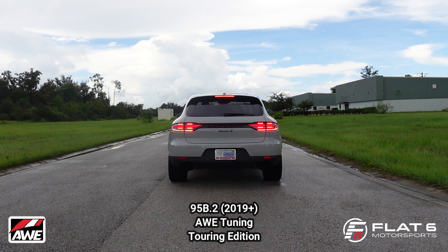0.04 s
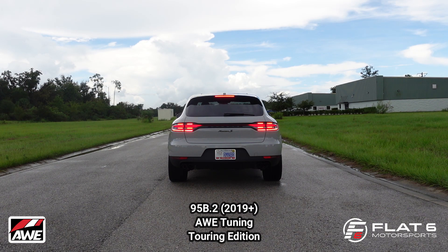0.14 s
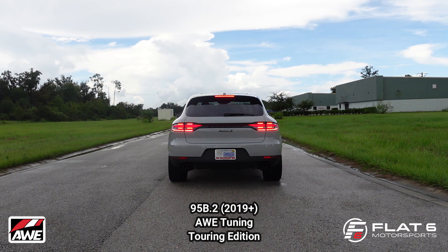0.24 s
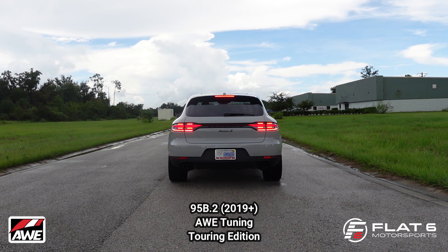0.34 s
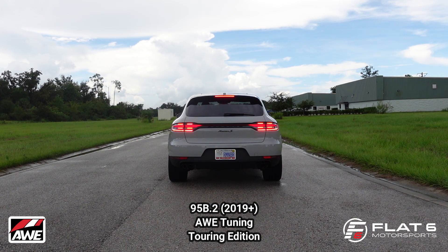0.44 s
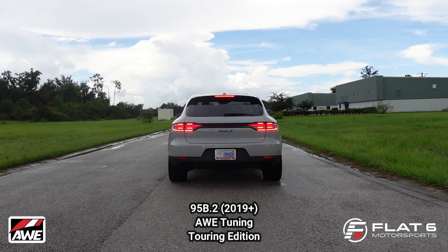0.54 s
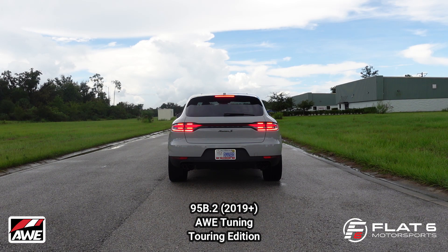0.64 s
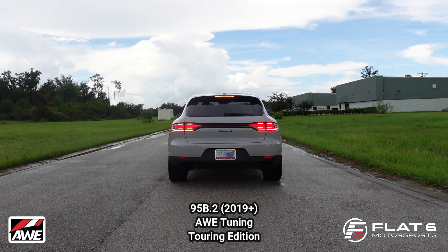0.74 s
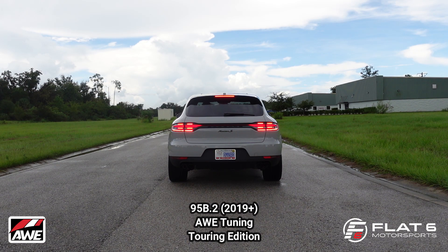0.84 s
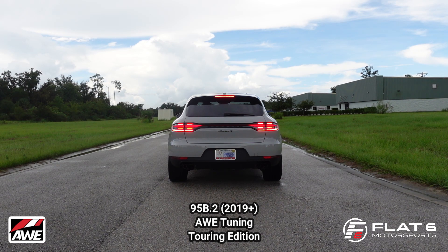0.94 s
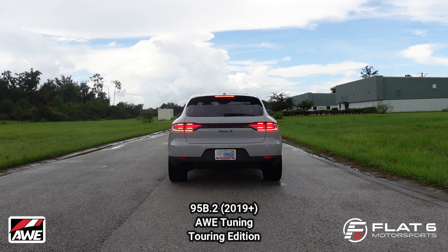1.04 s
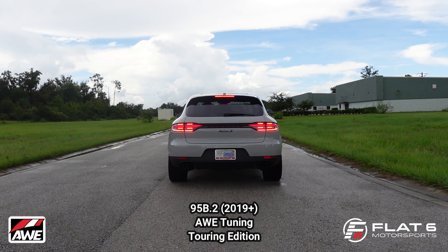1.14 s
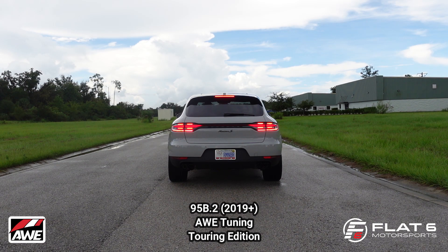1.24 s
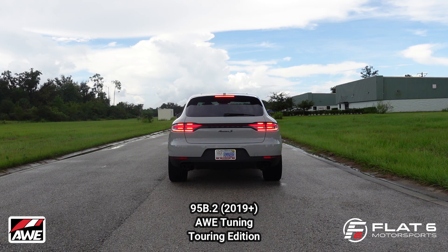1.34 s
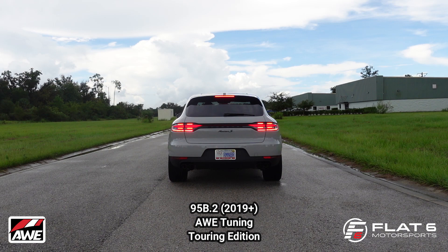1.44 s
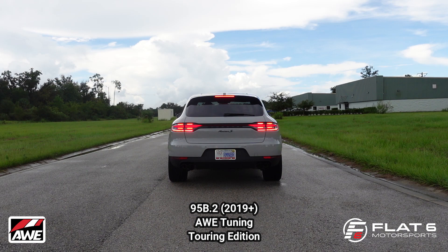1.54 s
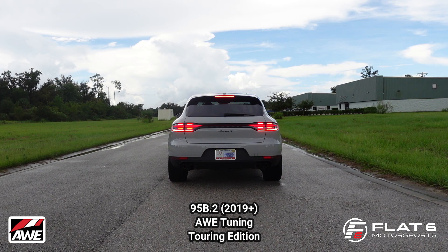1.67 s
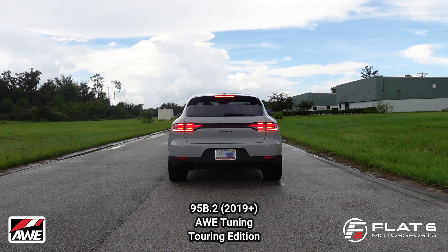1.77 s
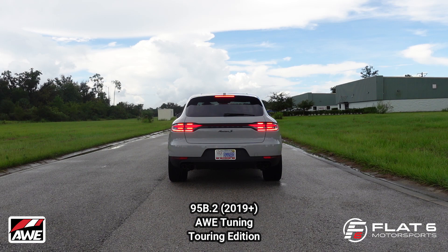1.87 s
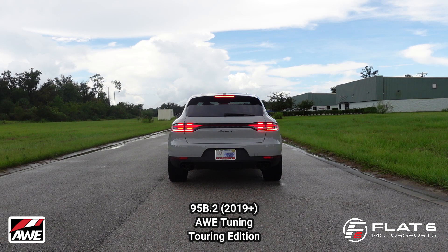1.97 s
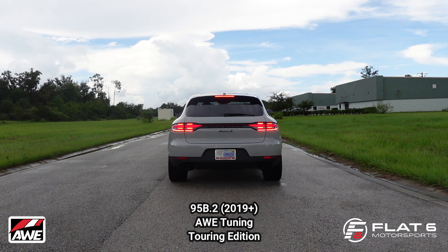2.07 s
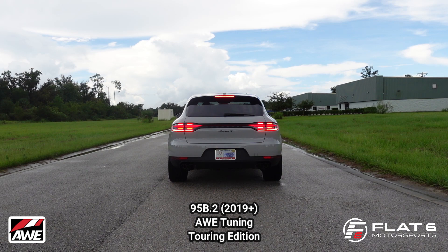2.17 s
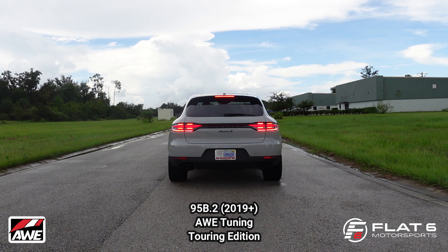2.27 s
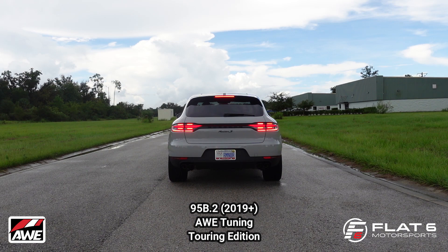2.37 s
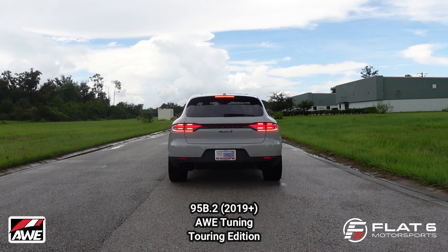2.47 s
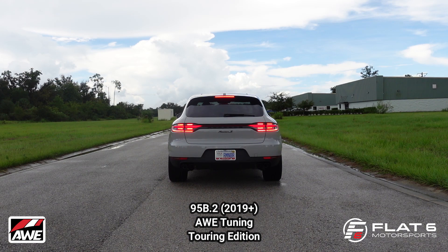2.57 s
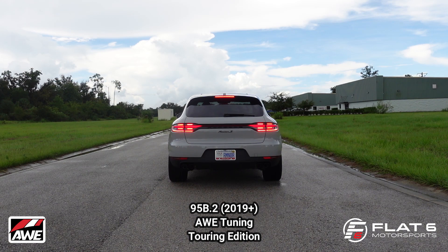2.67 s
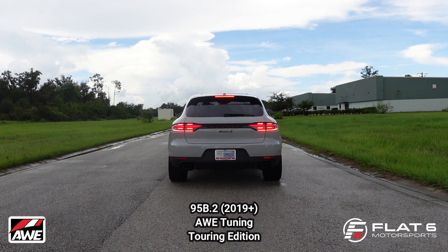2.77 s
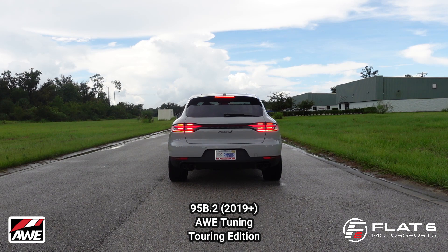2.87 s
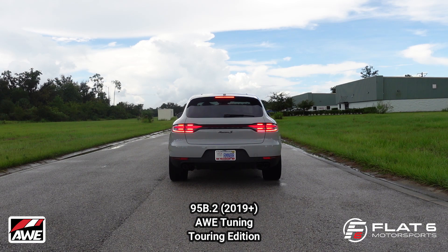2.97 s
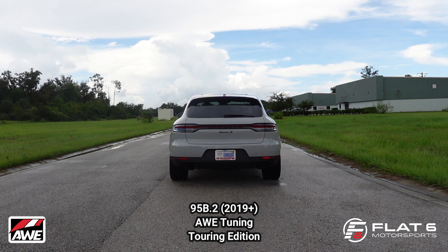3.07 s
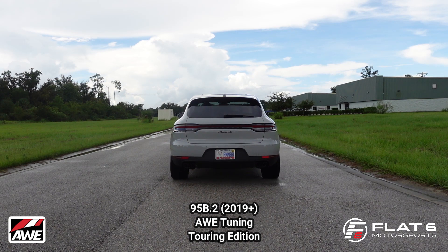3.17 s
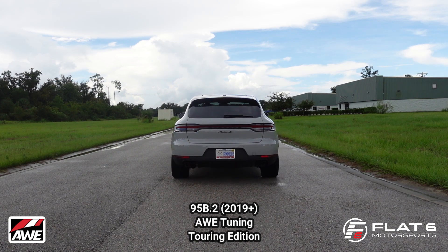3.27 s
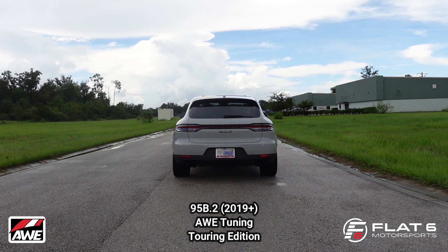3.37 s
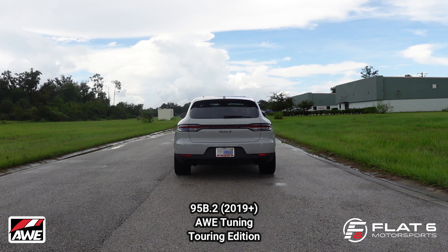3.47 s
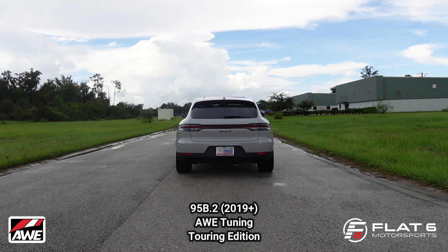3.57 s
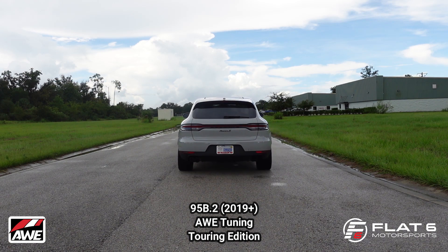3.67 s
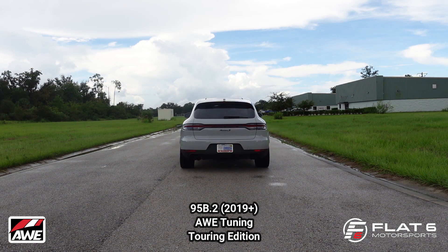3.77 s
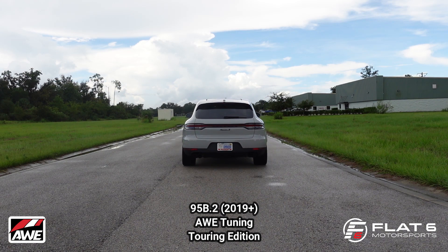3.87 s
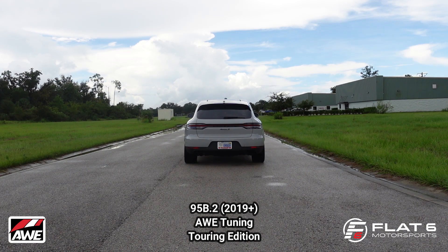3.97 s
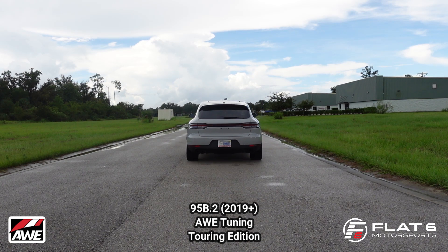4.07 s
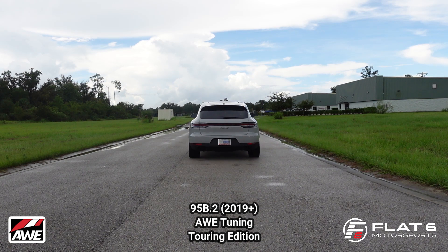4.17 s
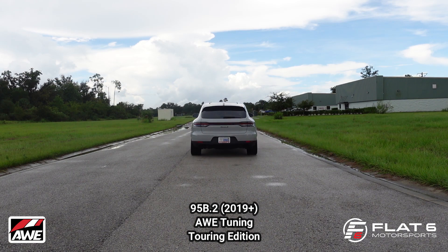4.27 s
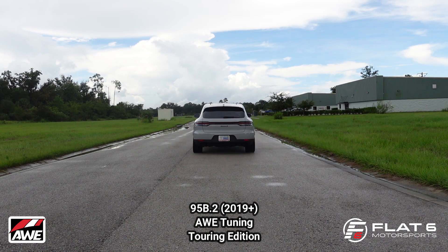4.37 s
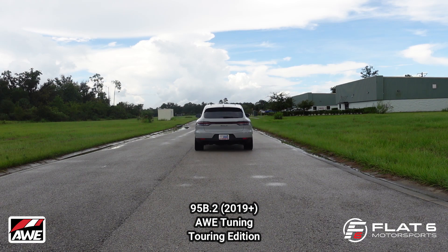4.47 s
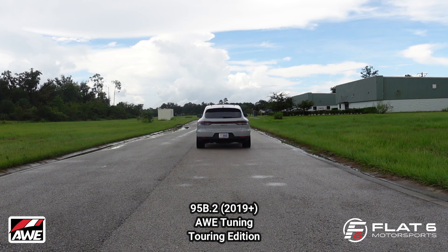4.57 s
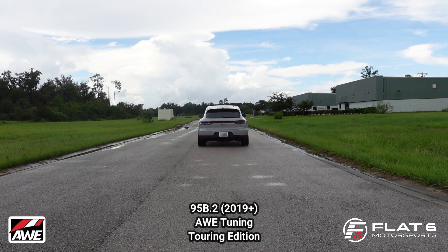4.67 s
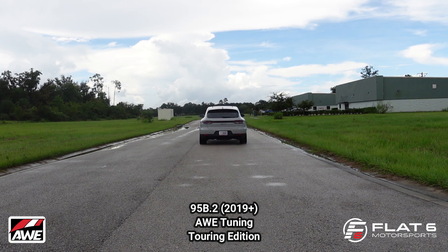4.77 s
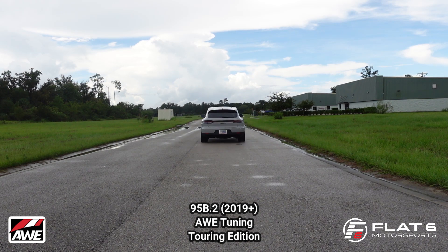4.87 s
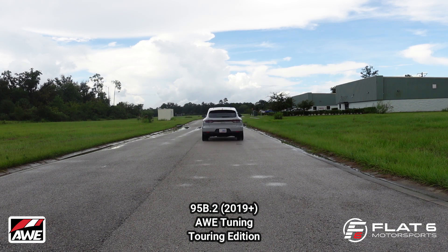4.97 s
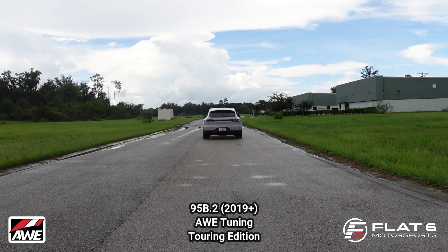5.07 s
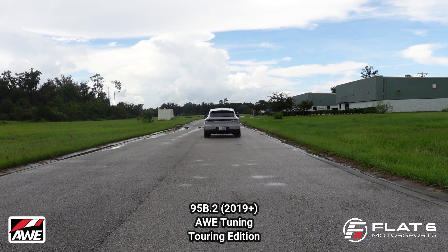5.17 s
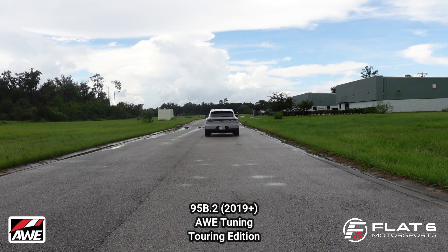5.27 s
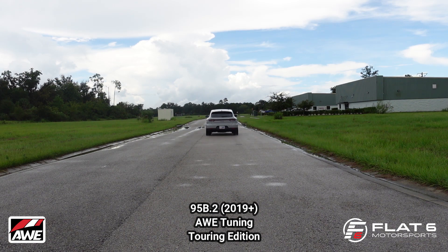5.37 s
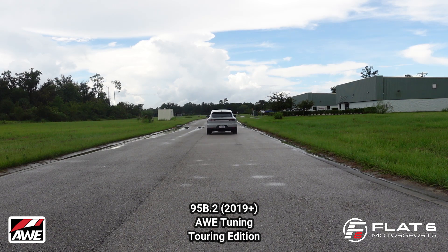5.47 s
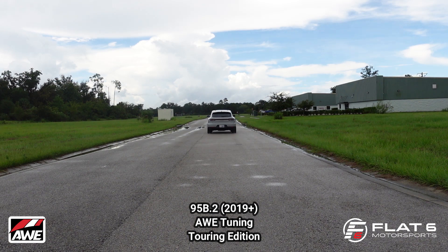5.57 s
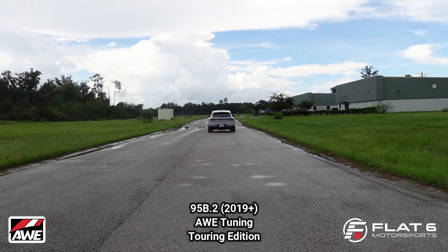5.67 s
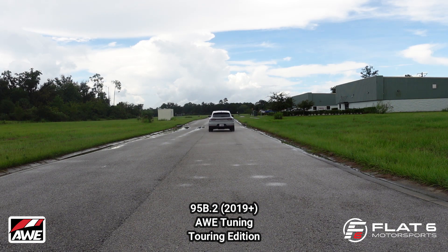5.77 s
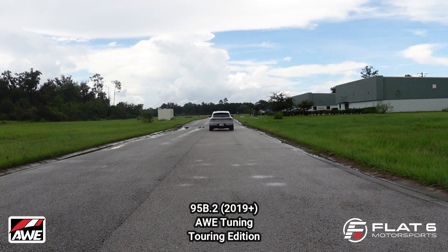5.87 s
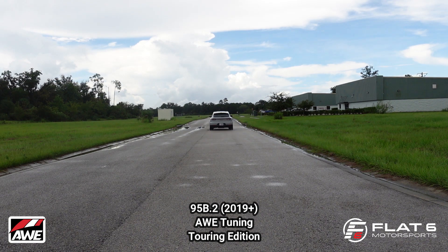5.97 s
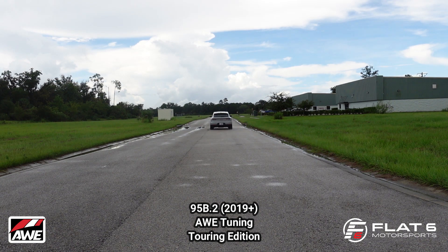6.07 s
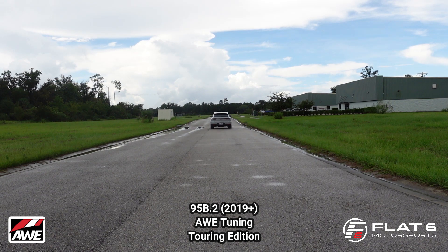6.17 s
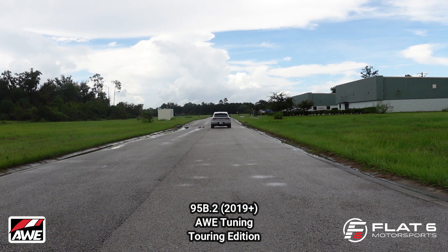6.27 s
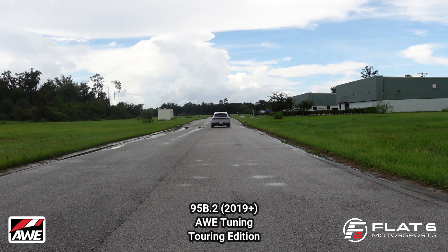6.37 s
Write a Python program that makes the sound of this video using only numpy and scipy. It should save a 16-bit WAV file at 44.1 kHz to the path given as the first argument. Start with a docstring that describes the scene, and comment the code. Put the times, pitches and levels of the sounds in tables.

```python
"""Car pulls away

A four-cylinder car idles, revs up, pulls away and shifts up once while insects shrill in the grass.
Idle firings are filtered impulses; the driven note sums engine orders that swell and sink between muffler nulls.
Each firing spits a chirp in noise and rings the tailpipes; pulsed noise makes turbulence, gas roar and hiss.
The ignition stutters during the shift. Two filtered noises make the insects, a third a soft wash of air."""
import sys
import numpy as np
from scipy import signal
from scipy.fft import rfft, irfft
from scipy.io import wavfile
from scipy.ndimage import uniform_filter1d

SR = 44100
rng = np.random.default_rng(int(sys.argv[2]) if len(sys.argv) > 2 else 0)


def store_pcm(level_fs):
    """Save levels as 16-bit WAV."""
    pcm = np.round(np.clip(level_fs, -1, 1) * 32767).astype(np.int16)
    wavfile.write(sys.argv[1], SR, np.atleast_2d(pcm).T)


N = 283563
T = np.arange(N) / SR  # seconds

# moments of the drive, in seconds
SETTLE_S, SETTLE_LENGTH_S = 0.52, 0.072  # the labouring idle calms down
OPEN_S, OPEN_LENGTH_S = 0.99, 0.38  # the idle turns raspier, as if an exhaust flap opens
THROTTLE_S, THROTTLE_RISE_S = 2.373, 0.13
GRIP_S, GRIP_LENGTH_S = 3.447, 0.14  # the clutch grips and the launch shudder ends
SHIFT_S, SHIFT_LENGTH_S = 5.24, 0.25  # the upshift drags the speed down to second gear


def amp(db):
    """Decibels to gain."""
    return 10 ** (np.asarray(db) / 20)


def evened(x):
    """Scales to rms 1."""
    return x / np.sqrt(np.mean(x ** 2) + 1e-20)


def curve(rows):
    """The columns of a time table, one value a sample."""
    s, *columns = np.transpose(rows)
    return [np.interp(T, s, c) for c in columns]


def ramp(start, length):
    """Rises from 0 to 1 over a length in seconds, then holds."""
    return np.clip((T - start) / length, 0, 1)


def swell(s, half):
    """A smooth bump of height 1 around a moment."""
    return np.exp(-((T - s) / half) ** 2)


def shape(points, hz):
    """Gain of a spectrum table on a log-frequency axis."""
    f, db = np.transpose(points)
    return amp(np.interp(np.log(hz + 1), np.log(f + 1), db))


def colour(x, points):
    """Causal minimum-phase filter with the given spectrum; output rms 1."""
    log_gain = np.log(shape(points, abs(np.fft.fftfreq(8192, 1 / SR))))
    # the Hilbert transform of the log gain gives the minimum phase
    ring = np.fft.ifft(np.exp(np.conj(signal.hilbert(log_gain)))).real[:4096]
    return evened(signal.oaconvolve(x, ring)[:N])


def noise():
    """White noise."""
    return rng.standard_normal(N)


def per_firing(turns):
    """One random value for each firing, joined by straight lines."""
    return np.interp(turns, np.arange(2048), rng.standard_normal(2048))


def puffs(turns, width, between, spread_db):
    """Noise that bursts once a firing, each burst with its own strength; width is in firing periods."""
    offset = (turns + .5) % 1 - .5
    gate = between + np.exp(-.5 * (offset / width) ** 2)
    power = uniform_filter1d(gate ** 2, size=4800)
    return noise() * gate / np.sqrt(power) * amp(spread_db * per_firing(turns))


def stages():
    """How far each stage of the drive holds, 0-1: flap open, throttle down, launching, shifting."""
    opened = ramp(OPEN_S, OPEN_LENGTH_S)
    throttle = ramp(THROTTLE_S, THROTTLE_RISE_S)
    launching = throttle * (1 - ramp(GRIP_S, GRIP_LENGTH_S))
    shifting = ramp(SHIFT_S - .015, 0.053) * (1 - ramp(SHIFT_S + 0.17, 0.14))
    return opened, throttle, launching, shifting


def speed():
    """Firings per second: idle, the pull in first gear, the drop of the shift, a steady climb in second."""
    # Engine speed at idle and in first gear. Each row: time in seconds, firings per second.
    idle_speed = [(0, 36.07), (0.78, 36.89), (1.16, 35.4), (1.5, 36.56)]
    first_gear = [(2.18, 37.27), (2.46, 44.74), (2.78, 67.43), (2.92, 71.53), (3.15, 80.3), (3.38, 104.7),
                  (3.63, 120.7), (4.15, 143.4), (4.29, 152.5), (4.42, 178.8), (4.6, 205.6), (4.97, 258.2),
                  (5.24, 271.6)]
    second_gear_hz, climb_hz_per_s = 181.2, 52
    first, = curve(list(idle_speed) + list(first_gear))
    second = second_gear_hz + climb_hz_per_s * np.maximum(T - SHIFT_S - SHIFT_LENGTH_S, 0)
    return first + (second - first) * ramp(SHIFT_S, SHIFT_LENGTH_S)


def idle(turns):
    """Separate, slightly uneven thumps; the boom drops as the engine settles, then swells and gains a honk."""
    # Colour of one idle firing, labouring and settled. Each row: frequency in Hz, level in dB.
    labouring_colour = [(36, -70), (73, -2.5), (110, 2), (146, -2), (182, -7), (219, 1), (255, -5),
                        (292, -14.5), (328, -1.5), (365, -37), (410, -13), (465, -41), (510, -13),
                        (700, -65)]
    settled_colour = [(36, -47), (73, 1.5), (110, 0.5), (146, -4.5), (182, -21), (219, -8), (255, -8.5),
                      (292, -23.5), (328, -2.5), (365, -21.5), (410, -12.5), (465, -28.5), (510, -19),
                      (700, -63)]
    skirt = [(1100, -78), (2500, -113)]  # continues both colours upwards
    honk_colour = [(250, -60), (370, -13), (425, 6), (470, -12.5), (520, -1), (620, -29.5), (1200, -58)]
    labouring_db, settled_db, open_db, honk_db = -21, -29, 4.5, -37.5  # open_db is a rise

    opened, _, _, _ = stages()
    beats = np.diff(np.floor(turns + .11 + .008 * per_firing(turns)), prepend=0) > 0
    beats[0] = False
    thumps = beats * amp(.9 * per_firing(turns))
    push = -(thumps + .011 * puffs(turns, width=.3, between=.3, spread_db=1.2))
    settled = ramp(SETTLE_S, SETTLE_LENGTH_S)
    labouring = colour(push, list(labouring_colour) + skirt) * amp(labouring_db - 2.8 * (1 - ramp(0, 0.18)))
    calm = colour(push, list(settled_colour) + skirt) * amp(settled_db + open_db * ramp(OPEN_S, 0.91))
    honk = colour(push, honk_colour) * amp(honk_db)
    sound = (1 - settled) * labouring + settled * calm + opened * honk
    return sound * (1 - ramp(2.19, 0.6))


def rasp(turns, rate):
    """Each firing spits a brief chirp with its own pitch, wrapped in noise; faster firings are crisper."""
    # Colour of the spitting noise. Each row: frequency in Hz, level in dB.
    spit_colour = [(500, -25), (800, -11.5), (1050, 1), (1300, -21), (1900, -4.5), (2250, -6), (2550, 5.5),
                   (2950, -8), (3350, -12), (3900, -36), (5000, -22), (8000, -38), (14000, -51)]
    # Idle firings that spit harder or softer than the rest. Each row: time in seconds, extra level in dB.
    hard_spits = [(0.636, 8), (1.521, 2), (1.630, 4.5), (1.874, 5), (1.982, -1), (2.222, 5.5)]
    idle_db, open_db, throttle_db, sag_db = -48.5, 8, 16.5, 5.5  # at idle, then two rises and a drop
    labouring_db, labouring_hz = 1.5, 100  # the rasp is louder and higher until the idle settles
    fade_db_per_s = 39.5  # once the car rolls

    opened, throttle, _, _ = stages()
    labouring = 1 - ramp(SETTLE_S, SETTLE_LENGTH_S)
    firing = np.round(turns - .03)
    age = (turns - .03 - firing) / rate  # seconds from the centre of the spit
    width = 0.0021 * (36 / rate) ** 0.77  # seconds
    gate = np.exp(-.5 * (age / width) ** 2) / np.sqrt(rate * width)
    hard_db = sum(db * swell(s, .012) for s, db in hard_spits)
    strength = amp(1.7 * np.clip(per_firing(firing), -2, 1.5) + hard_db)

    pitch = 2720 + 190 * per_firing(firing) + 150 * ramp(2.4, 0.25) + labouring_hz * labouring
    glide = 25000 + 25000 * per_firing(firing)  # the pitch usually falls within a chirp
    start_phase = 3 * per_firing(firing)
    chirp = evened(gate * np.cos(2 * np.pi * (pitch - glide * age) * age + start_phase))
    spit = colour(noise() * (gate + 0.29), spit_colour)
    sound = (amp(-2.0 + 1.1 * throttle) * spit + amp(-3.5 - 1.4 * throttle) * chirp) * strength

    level_db = idle_db + open_db * opened + throttle_db * throttle + labouring_db * labouring
    level_db = level_db - sag_db * ramp(THROTTLE_S + THROTTLE_RISE_S, 0.37)
    return sound * amp(level_db - fade_db_per_s * np.maximum(T - GRIP_S, 0))


def knock(turns):
    """Firings strike the tailpipes, which ring near a kilohertz in uneven groups, hardest under launch load."""
    # Ring of the tailpipes. Each row: frequency in Hz, width in Hz, level in dB.
    tailpipe_modes = [(940, 216, -1), (1070, 210, -5.5)]
    idle_db, open_db, launch_db = -28, 4, 18.5  # at idle, then what each stage adds

    opened, _, launching, _ = stages()
    single_db = 4 * np.clip(per_firing(turns), -2, 1.5)
    group_db = 5 * np.clip(per_firing(turns / 3), -2, 1)  # drifts over three firings
    blows = np.diff(np.floor(turns + 0.1416), prepend=0) * amp(single_db + group_db)
    t = T[:SR // 10]
    ring = np.zeros(len(t))
    for hz, width, db in tailpipe_modes:
        envelope = width * t * np.exp(-np.pi * width * t)
        ring += amp(db) * envelope * np.sin(2 * np.pi * hz * t)
    level_db = idle_db + open_db * opened + launch_db * launching
    return signal.oaconvolve(blows, ring)[:N] * amp(level_db)


def outdoors():
    """A shrill insect chorus of narrow noise, a little to the left, over a soft wash of air."""
    # Level of the insect chorus. Each row: time in seconds, level in dB.
    chorus_db = [(0.0, -55.5), (2.45, -54), (3.45, -60.5), (3.65, -68), (5.3, -68), (6.43, -57.5)]
    # Colours of the nearer insects and of the air. Each row: frequency in Hz, level in dB.
    near_colour = [(6000, -32.5), (8200, -25), (8900, -11.5), (9500, -6.5), (9900, 5.5), (10300, -5),
                   (10800, -19.5), (13000, -54)]
    air_colour = [(25, -22), (60, -8), (200, 13), (600, -3.5), (950, -2), (1400, -16.5), (1900, -12),
                  (3000, -17.5), (3900, -34), (5000, -25), (8000, -39), (12000, -46.5), (15000, -55)]
    wide_colour = [(7000, -23.5), (8400, 7), (9000, -30.5), (9500, 29.5), (10000, -18), (12000, -43)]

    near = colour(noise(), near_colour) * np.array([[1.15], [.85]])
    # opposite signs left and right widen the chorus
    wide = colour(noise(), wide_colour) * np.array([[1.2], [-.7]])
    chorus = (near + amp(-4.0) * wide) * amp(curve(chorus_db)[0])
    return chorus + amp(-37.5) * colour(noise(), air_colour)


def scatter(x, t60):
    """Faint, dull reflections from the road, trees and buildings: sparse decaying taps, different on each side."""
    t = T[:SR // 2]
    taps = rng.standard_normal((2, len(t))) * (rng.random((2, len(t))) < .05)
    taps = taps * amp(-60 * t / t60) * (t > .004)
    taps = signal.lfilter([1], [1, -.5], taps)  # dulls the treble
    return signal.fftconvolve(x[None], taps / np.linalg.norm(taps[0]), axes=1)[:, :N]


def flow(turns):
    """Gas leaving the tailpipes roars and hisses in time with the firings; a smoother fizz lies on top."""
    # Colours of the three noises. Each row: frequency in Hz, level in dB.
    roar_colour = [(300, -19), (650, 8.5), (1100, 5), (1500, 4), (2400, 1), (3200, -8.5), (4500, -12.5),
                   (8000, -72.5), (14000, -82.5)]
    hiss_colour = [(1500, -39), (2800, 6), (3600, 6), (4600, 4.5), (5600, -12), (8000, -41)]
    fizz_colour = [(3500, -5.5), (5500, 8.5), (7000, 3), (9000, -1.5), (10500, -8.5), (12000, -13),
                   (15000, -26.5)]
    # Course of the roar, ahead of the offsets below. Each row: time in seconds, level in dB.
    roar_course = [(2.38, -46.5), (2.5, -40.5), (3.47, -32), (3.69, -42), (4.39, -32), (4.4, -40.5),
                   (6.02, -37.5), (6.43, -32)]
    # Course of the treble, ahead of the offsets. Each row: time in seconds, hiss in dB, fizz in dB.
    treble_course = [(2.38, -49, -59), (2.47, -43, -50.5), (3.46, -40, -50.5), (3.74, -53, -59.5),
                     (4.07, -48.5, -51.5), (4.35, -36, -54.5), (4.47, -44, -60.5), (4.64, -42, -46),
                     (4.83, -50.5, -54), (4.86, -38, -53.5), (5.1, -52.5, -52.5), (5.21, -48, -62),
                     (5.8, -41.5, -49.5), (6.03, -52, -53.5), (6.26, -49, -46), (6.43, -46, -48)]

    opened, throttle, launching, _ = stages()
    roar_db, = curve(roar_course)
    hiss_db, fizz_db = curve(treble_course)
    steady = 3 * (1 - throttle)  # at idle the hiss hardly pulses
    roar = colour(puffs(turns, width=0.28, between=0.98, spread_db=2.0), roar_colour)
    hiss = colour(puffs(turns, width=0.13, between=0.48 + steady, spread_db=3.0), hiss_colour)
    fizz = colour(puffs(turns, width=0.27, between=1.0 + steady, spread_db=1.5), fizz_colour)
    sound = roar * amp(roar_db + 4.5 - 4.2 * launching)
    sound += hiss * amp(hiss_db + 1.45 - 9 * (1 - throttle))
    sound += fizz * amp(fizz_db + 2.5)
    return sound * opened * amp(-5 * (1 - throttle))


def pipe(hz):
    """Complex response of the hot exhaust pipe: a sum of resonances."""
    # Modes of the pipe. Each row: frequency in Hz, width in Hz, level in dB.
    modes = [(281, 11, 9), (364.7, 17, 8.5), (456, 9.2, 9.5), (547, 10, 11), (635, 22, -8.5),
             (780, 19, -5.5), (885, 41, -8), (1060, 120, -9.5)]
    return sum(amp(db) * hz * width / (hz * width + 1j * (hz ** 2 - f ** 2)) for f, width, db in modes)


def muffler(hz):
    """Complex gain of the exhaust for a tone: a broad hump cut by nulls."""
    # Broad response of the exhaust to the firings. Each row: frequency in Hz, level in dB.
    hump = [(45.0, -33), (80.0, -8.5), (135.0, -7.5), (200.0, -5), (260.0, -1), (360.0, 4.5), (560.0, 7.5),
            (660.0, -7), (770.0, -24.5), (890.0, -29), (1100.0, -38.5), (2000.0, -55.5)]
    # Tones that cancel in the muffler. Each row: frequency in Hz, width in Hz, depth in dB.
    nulls = [(221, 17.3, -10.5), (322.2, 18.3, -10.5), (424, 68.4, -19), (511.3, 51, -13.5),
             (600, 83, -16.5), (694, 27, -13)]
    dips = [(1j * (hz - f) + width * amp(db)) / (1j * (hz - f) + width) for f, width, db in nulls]
    return shape(hump, hz) * np.prod(dips, axis=0)


def exhaust(turns, rate):
    """Firing orders sweep past the muffler's nulls, over turbulence that rings the pipe's modes."""
    # Course of the engine note. Each row: time in seconds, level in dB.
    load = [(2.4, -18), (2.55, -14.5), (2.78, -8.5), (3.05, -8.5), (3.18, -11.5), (3.45, -11), (3.56, -10),
            (4.3, -12.5), (4.7, -9.5), (4.95, -10), (5.22, -13), (5.35, -15), (5.55, -16), (6.05, -15.5),
            (6.4, -10)]
    # Bite of the orders above about 700 Hz. Each row: time in seconds, level in dB.
    bite = [(2.4, -5), (3.6, 0), (4.3, 1), (4.72, 10), (4.95, -3), (5.24, -1), (5.5, 8.5), (6.43, 1)]
    # Bands that boom or thin under launch load. Each row: centre in Hz, width in Hz, level in dB.
    launch_colour = [(134, 17.6, 3.5), (259, 65, -4), (360, 24.5, 6), (760, 110, -3)]
    # Ignition cuts during the upshift. Each row: time in seconds, half length in seconds.
    cuts = [(5.249, 0.0037), (5.274, 0.0051), (5.291, 0.0037), (5.32, .004), (5.353, 0.0025),
            (5.377, 0.002), (5.398, 0.0035), (5.437, 0.0038), (5.465, 0.0024)]
    gas_colour = [(30, -8.5), (70, 0), (1500, 1.5), (5000, -10.0), (12000, -34)]
    rush_colour = [(25, -24.5), (70, -22.0), (150, -10.0), (300, -2.0), (450, 6), (560, 7), (680, -12.5),
                   (1100, -7.5), (2000, -33.5), (5000, -57)]
    thump_colour = [(25, -55), (45, -22), (72, 0), (110, 0), (200, -12), (600, -50)]
    tilt_launch_db, tilt_rolling_db = 5, 0.42  # fall of the orders per octave
    rough_rolling, rough_launch, rough_shift = .04, .05, .22  # unevenness: a base, then what stages add
    lope_share = 0.94  # strong-weak alternation of the firings, as a share of the unevenness
    stumble_s, stumble_half_s, stumble_lope = 4.36, 0.05, .13  # a brief lope as the revs pick up
    turbulence_db, turbulence_launch_db, turbulence_shift_db = -27, 2.5, 10.5  # a base, then additions
    turbulence_fade_db_per_s = 5  # from the shift on

    _, _, launching, shifting = stages()
    load_db, = curve(load)
    bite_db, = curve(bite)
    tilt_db = tilt_launch_db + (tilt_rolling_db - tilt_launch_db) * ramp(GRIP_S, 1.25)
    rough = rough_rolling + rough_launch * launching + rough_shift * shifting
    phase = 2 * np.pi * (turns + .17 * rough * per_firing(turns))
    note = np.zeros(N)
    for k in range(1, 15):
        hz = k * rate
        band_db = sum(db * np.exp(-((hz - f) / width) ** 2) for f, width, db in launch_colour)
        upper = np.clip((hz - 620) / 160, 0, 1)
        order_db = load_db - tilt_db * np.log2(k) + launching * band_db + upper * bite_db
        gain = muffler(hz) * amp(order_db)
        # the exhaust delays low tones more than high ones, which spreads each pulse
        lag = 3 * np.log(hz / 130)
        note += (gain * np.exp(1j * (k * phase - lag))).real
    # unlike cylinders add half orders
    lope = lope_share * rough + stumble_lope * swell(stumble_s, stumble_half_s)
    note *= np.sqrt(2) * (1 + rough * per_firing(turns) + lope * np.cos(np.pi * turns))

    gas = colour(puffs(turns, width=0.49, between=0.46, spread_db=4.3), gas_colour)
    # padding to twice the length keeps the ring from wrapping round
    spectrum = rfft(gas, 2 * N) * pipe(np.fft.rfftfreq(2 * N, 1 / SR))
    ringing = evened(irfft(spectrum)[:N])
    rush = colour(gas, rush_colour)
    churn_db = turbulence_db + turbulence_launch_db * launching + turbulence_shift_db * shifting
    churn_db = churn_db - 8 * (1 - ramp(THROTTLE_S, 0.19))
    churn_db = churn_db - turbulence_fade_db_per_s * np.maximum(T - SHIFT_S, 0)
    churn = amp(churn_db) * (amp(-1.5) * ringing + amp(-4.0) * rush)

    cut = np.minimum(sum(swell(s, half) for s, half in cuts), 1)
    # each break in the gas flow during the shift leaves a low thump
    thumps = amp(-55) * colour(cut, thump_colour)
    return (note * amp(0.26) + churn) * (1 - 0.49 * cut) * ramp(2.32, 0.11) + thumps


def scene():
    """One crankshaft drives every layer of the car."""
    rate = speed()
    turns = np.cumsum(rate) / SR + .8  # counts firings
    bright = rasp(turns, rate) + knock(turns) + flow(turns)
    car = idle(turns) + exhaust(turns, rate) + bright
    lean_db = -.3 * ramp(THROTTLE_S, 0.17)  # the moving car is a little to the right
    direct = car + amp(-17.5) * scatter(bright, t60=0.062)[0]
    placed = direct * amp(np.array([lean_db, -lean_db]))
    return placed + amp(-31.0) * scatter(car, t60=1.0) + outdoors()


def record(dry):
    """A steep low-pass limits the band."""
    edge_hz = 15050
    low_pass = signal.firwin(511, edge_hz, window=("kaiser", 9), fs=SR)
    return signal.oaconvolve(dry, low_pass[None], "same")


dry = scene()
out = record(dry)
store_pcm(out)
```